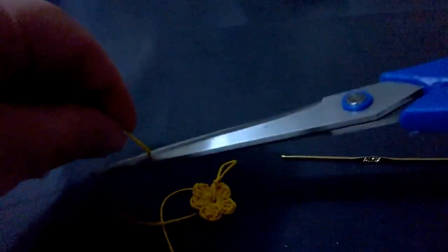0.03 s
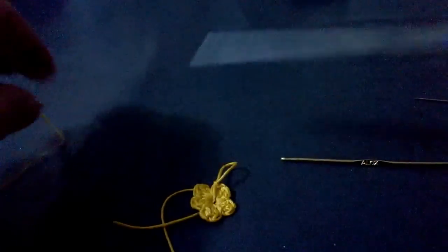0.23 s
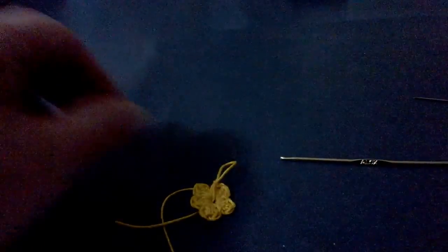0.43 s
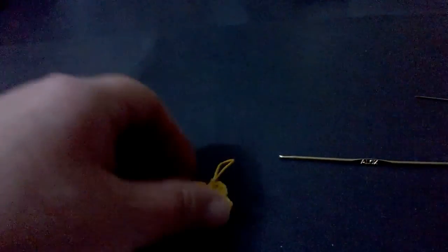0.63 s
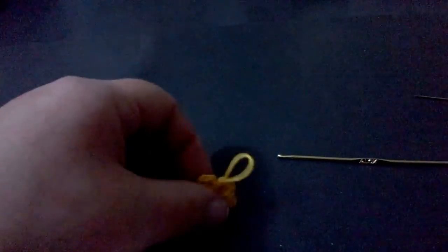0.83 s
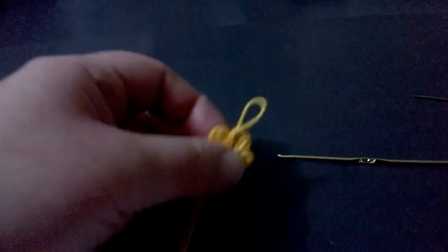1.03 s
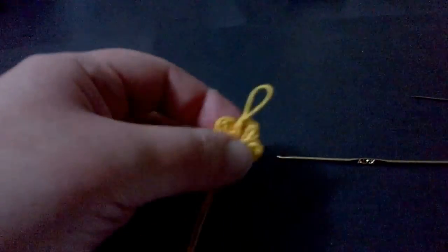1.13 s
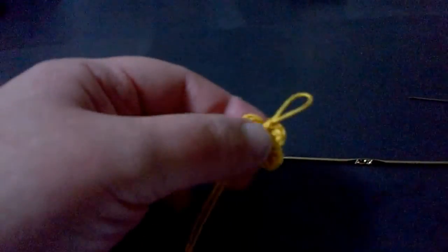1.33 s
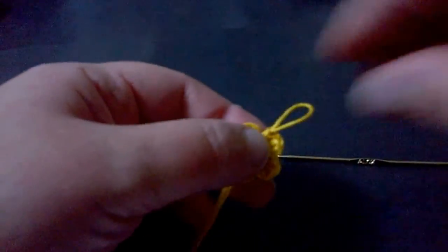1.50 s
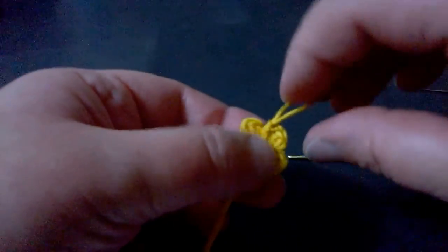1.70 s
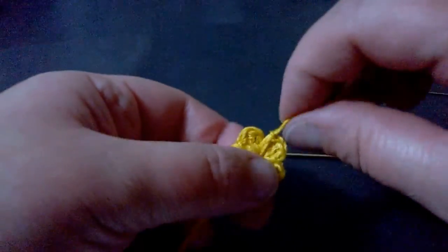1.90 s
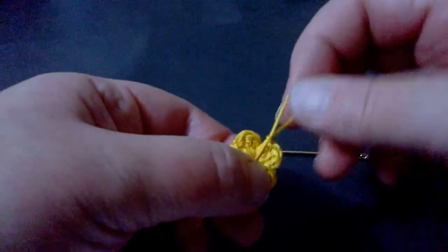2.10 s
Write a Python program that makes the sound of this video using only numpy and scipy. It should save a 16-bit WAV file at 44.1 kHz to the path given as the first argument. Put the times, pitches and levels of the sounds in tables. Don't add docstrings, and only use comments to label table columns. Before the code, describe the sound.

Scissors cut a thread with a bright, dry snip near the start; about a second later they are set down with a short rattling wooden knock, amid soft hand bumps and faint fan hiss, close microphone, small room.

```python
import sys
import numpy as np
from scipy import signal
from scipy.fft import rfft, irfft, next_fast_len
from scipy.io import wavfile
from scipy.ndimage import uniform_filter1d, map_coordinates

SR = 44100
rng = np.random.default_rng(int(sys.argv[2]) if len(sys.argv) > 2 else 0)


def wav_out(sig):
    wavfile.write(sys.argv[1], SR, np.round(np.clip(np.atleast_2d(sig).T, -1, 1) * 32767).astype(np.int16))


def ratio_of_db(decibels):
    return 10 ** (np.asarray(decibels, float) / 20)


N = 94815
SCATTER_DB = 1.5


def unit(x):
    return x / np.sqrt(np.mean(x ** 2) + 1e-20)


def along(points, hz):
    f, v = np.transpose(points)
    return np.interp(np.log(hz + 1), np.log(f + 1), v)


def level(rows):
    columns = np.transpose(rows)
    return ratio_of_db(np.interp(np.arange(N) / SR, columns[0], columns[-1]))


def wobble(rate):
    return map_coordinates(rng.standard_normal(400), [np.arange(N) * rate / SR])


def filtered(x, response):
    m = next_fast_len(N + SR // 2)
    hz = np.fft.rfftfreq(m, 1 / SR)
    return irfft(rfft(x, m) * response(hz), m)[..., :N]


def noise(response, patchy_db):
    z = signal.stft(rng.standard_normal(N), nperseg=512)[2]
    field = uniform_filter1d(rng.standard_normal(z.shape), size=4, axis=0)
    field = uniform_filter1d(field, size=12, axis=1)
    patchy = signal.istft(z * ratio_of_db(patchy_db * unit(field)), nperseg=512)[1][:N]
    return unit(filtered(patchy, response))


def struck(s, db, modes, attack_s, scatter_db):
    start = round(s * SR)
    t = np.clip(np.arange(N) / SR - s, 0, None)[start:][:SR // 3]
    hz, level_db, t60 = np.transpose(modes)[:, :, None]
    level_db = level_db + scatter_db * rng.standard_normal(hz.shape)
    ring = (ratio_of_db(db + level_db - 60 * t / t60) * np.sin(2 * np.pi * hz * t)).sum(0)
    out = np.zeros(N)
    out[start:][:len(t)] = ring * (1 - np.exp(-t / attack_s))
    return out


# (frequency [Hz], level [dB])
HISS_TONE = [(20, -5.5), (120, -3.5), (450, -4), (750, -16.5), (2400, -11.5), (3400, -13.5), (4300, -22.5),
             (16000, -35)]
# (time [s], level [dB])
RUMBLE = [(0, -80), (.8, -72), (1.7, -70), (1.85, -58.5), (1.95, -58.5), (2.15, -76)]
# (start [s], end [s], frequency [Hz], level [dB])
DRONES = [
    (0.47, 0.64, 294, -65.5),
    (0.685, .9, 294, -68.5),
    (1.706, 2.023, 430, -63),
    (0.497, 0.726, 83, -69),
    (1.9, 2.08, 220, -70),
    (1.62, 1.83, 960, -75.5),
]


def background():
    t = np.arange(N) / SR
    drones = np.zeros(N)
    for start_s, end_s, hz, db in DRONES:
        swell = np.sin(np.pi * np.clip((t - start_s) / (end_s - start_s), 0, 1)) ** 0.74
        tone = np.sin(2 * np.pi * hz * t + .5 * wobble(25.07))
        drones += ratio_of_db(db + 2.2 * wobble(21.92)) * swell * tone
    centre_hz, width_hz = 36.3, 21.3
    rumble = level(RUMBLE) * noise(lambda hz: np.exp(-((hz - centre_hz) / width_hz) ** 2), patchy_db=2.5)
    hiss = ratio_of_db(-66.5) * noise(lambda hz: ratio_of_db(along(HISS_TONE, hz)), patchy_db=.3)
    return hiss + rumble + drones


# (time [s], level [dB])
WHINE = [(0, -83), (.2, -96), (.26, -59), (.32, -67), (.47, -55), (.67, -60.5), (1.04, -59.5),
         (1.16, -70.5), (1.2, -61), (1.3, -67.5), (1.39, -64.5), (1.44, -82), (1.65, -59), (1.74, -80),
         (1.78, -62.5), (1.84, -69), (1.91, -54.5), (2.07, -62.5), (2.15, -54)]
# (time [s], level [dB])
FIFTH = [(0, -78), (.3, -72), (.5, -65.5), (.57, -75), (1.0, -72.5), (1.11, -59), (1.17, -84), (1.4, -81),
         (1.48, -57), (1.68, -89), (1.8, -62), (1.85, -75), (2.15, -67.5)]
# (multiple of the turning rate [-], level [dB], flutter [dB])
ORDERS = [(6, -73.5, 4), (14, -92, -4)]
# (frequency [Hz], width [Hz], level [dB])
HOUSING = [(1298, 75, -5), (1316, 32.3, -0.5), (1624, 36, -8), (1767, 51, -18.5), (1744, 29, 5.5),
           (1904, 25, 6), (2038, 10, -0.5)]
# (time [s], level [dB])
AIR = [(0, -65.5), (.15, -63.5), (.4, -62.5), (.49, -61), (.58, -62), (.8, -61.5), (.93, -60.5),
       (1.0, -61.5), (1.09, -62), (1.3, -63), (1.48, -61.5), (1.6, -62.5), (1.72, -65), (1.79, -62),
       (1.85, -62.5), (2.15, -62)]
# (frequency [Hz], level [dB])
AIR_TONE = [(750, -17.5), (1000, -9), (1320, 0.5), (1600, -2.5), (1900, -4), (2150, -6.5), (2500, -27.5),
            (3200, -42)]


def fan():
    motor_hz, wander_hz = 284.75, .25
    turn = 2 * np.pi * np.cumsum(motor_hz + wander_hz * wobble(13)) / SR
    tones = level(WHINE) * ratio_of_db(1.2 * wobble(30)) * np.sin(7 * turn)
    tones += level(FIFTH) * np.sin(5 * turn + 2)
    for order, db, flutter_db in np.round(ORDERS):
        tones += ratio_of_db(db + flutter_db * wobble(8.48)) * np.sin(order * turn + order)

    def resonances(hz):
        return sum(ratio_of_db(db) * 1j * hz * width / (centre * centre - hz * hz + 1j * hz * width)
                   for centre, width, db in HOUSING)

    shade = level(AIR)
    air = shade * noise(lambda hz: ratio_of_db(along(AIR_TONE, hz)), patchy_db=3.0)
    housing = ratio_of_db(-66) * shade / shade.mean() * noise(resonances, patchy_db=2.5)
    return np.sqrt(2) * tones + air + housing


# (frequency [Hz], t60 [s])
ROOM_DECAY = [(300, 0.13), (2000, 0.24), (5000, .22), (8000, 0.3), (12000, 0.16), (15000, 0.15)]
# (frequency [Hz], level [dB])
ROOM_TONE = [(300, -26.5), (1400, -9), (3200, -8.5), (4800, -19.5), (5400, -11.5), (6600, -9), (8700, -2),
             (12200, -6.5), (15800, -38)]
# (delay [s], level over the tail [dB])
WALLS = [(.0082, 7), (.0120, 6), (.0140, 4), (.0157, 4), (.0245, 4), (.0272, 4)]


def room(x):
    gap_s, rise_s, ends_s, wall_s = 0.0016, 0.01, 0.11, 0.001
    hz, t, z = signal.stft(rng.standard_normal(SR // 2), SR, nperseg=128)
    decay = ratio_of_db(-60 * t / along(ROOM_DECAY, hz)[:, None])
    tail = signal.istft(z * decay, SR, nperseg=128)[1]
    t = np.arange(len(tail)) / SR
    tail *= 1 - np.exp(-np.clip(t - gap_s, 0, None) / rise_s)
    tail *= np.exp(-(t / ends_s) ** 4)
    tail *= ratio_of_db(sum(db * np.exp(-((t - s) / wall_s) ** 2) for s, db in WALLS))
    tail *= ratio_of_db(2) / np.linalg.norm(tail)
    return filtered(signal.fftconvolve(x, tail)[:N], lambda hz: ratio_of_db(along(ROOM_TONE, hz)))


# (time [s], level [dB])
BUMPS = [
    (.53, -59),
    (.60, -53.5),
    (1.021, -59),
    (1.1197, -41),
    (1.139, -43.5),
    (1.162, -54),
    (1.40, -37),
    (1.44, -48),
    (1.72, -62),
]
# (frequency [Hz], level [dB], t60 [s])
PADDED = [(45, -6, 0.12), (92, 4.5, 0.073), (135.4, 0.5, 0.13), (225, -3, 0.028), (410, -15.5, 0.15)]
# (time [s], level [dB], frequency [Hz])
TICKS = [
    (.520, -56, 2300),
    (.515, -62, 425),
    (.596, -59, 3200),
    (.597, -63, 4000),
    (1.105, -60, 2200),
    (1.79, -67, 560),
]


def hands():
    bumps = sum(struck(s, db - 7, PADDED, attack_s=0.00094, scatter_db=1.0) for s, db in BUMPS)
    ticks = sum(struck(s, db, [(hz, 0, 0.025)], attack_s=.0004, scatter_db=0) for s, db, hz in TICKS)
    return bumps + ticks


KNOCK_S = [
    1.3576,
    1.3588,
    1.3624,
    1.3660,
    1.3708,
    1.3732,
    1.3768,
    1.3808,
    1.3995,
]
# (level [dB], hardness [dB])
KNOCK_DB = [(-45, 20.5), (-27, -13.5), (-37.5, -27), (-30.5, -22), (-39, 10.5), (-30, -3), (-41.5, -14),
            (-30.5, -22), (-38, -13)]
# (frequency [Hz], level [dB], t60 [s])
TABLE = [(153, -11.5, 0.21), (218.5, 0, 0.076), (256, 1, 0.07), (356, 0, 0.084), (501.5, -2.5, .07),
         (632.6, -16.5, 0.15)]
# (frequency [Hz], level [dB], t60 [s])
TABLE_TOP = [(883, -14.5, 0.11), (1047, 0, 0.023), (1185, 0, 0.012)]
# (time [s], level [dB])
RATTLES = [
    (1.333, -70),
    (1.3580, -59),
    (1.3598, -51),
    (1.3650, -56),
    (1.3722, -65),
    (1.3740, -59),
]
# (frequency [Hz], level [dB], t60 [s])
LOOSE = [(5000, -18, .004), (8200, -5, .012), (10600, -8, .005), (11650, 1, .011), (12300, -3, .009),
         (15200, -18, .005)]


def set_down():
    out = np.zeros(N)
    for s, (db, hard_db) in zip(KNOCK_S, KNOCK_DB):
        out += struck(s, db - 8.5, TABLE, attack_s=0.00074, scatter_db=SCATTER_DB)
        out -= struck(s, db + hard_db - 9, TABLE_TOP, attack_s=0.00021, scatter_db=SCATTER_DB)
    for s, db in RATTLES:
        out += struck(s, db, LOOSE, attack_s=0.0001, scatter_db=SCATTER_DB)
    return out


# (frequency [Hz], level [dB])
SHEAR_TONE = [(150, 4), (1000, -28), (3000, -8), (6000, -3), (9000, -8), (13000, -4), (15500, -34)]
SNAP_S = [
    .2017,
    .2024,
    .20484,
    .20508,
    .20556,
    .20600,
    .20642,
    .20682,
    .20708,
    .2077,
]
# (level [dB], brightness [dB])
SNAP_DB = [(-44, 4), (-42, 4), (-19.5, -8), (-33, 21.5), (-33, 17), (-30, 13), (-24, 2), (-31, 11),
           (-33, 13), (-46, 13)]
# (frequency [Hz], level [dB], t60 [s])
BLADES = [(1400, -3, 0.0038), (2240, 2.5, 0.015), (2890, -1.5, 0.0077), (3440, -14, 0.016)]
# (frequency [Hz], level [dB], t60 [s])
EDGES = [(5900, -6, .0025), (7150, -4, .003), (8150, -2, .003), (9400, -7, .003), (10800, -8, .003),
         (11900, -11, .0025)]
# (frequency [Hz], level [dB], t60 [s])
GRIP = [(71, -52, 0.093), (173, -37, 0.013), (358, -33.5, .03), (700, -65, 0.025)]


def snip():
    start_s, end_s, scrape_db, rise_db = .1945, .2042, -41, 20
    part = (np.arange(N) / SR - start_s) / (end_s - start_s)
    out = noise(lambda hz: ratio_of_db(along(SHEAR_TONE, hz)), patchy_db=0)
    out *= (part > 0) * (part < 1) * ratio_of_db(scrape_db + rise_db * (np.clip(part, 0, 1) - 0.5))
    for s, (db, bright_db) in zip(SNAP_S, SNAP_DB):
        out += struck(s, db - 5.5, BLADES, attack_s=.00005, scatter_db=SCATTER_DB)
        out -= struck(s, db + bright_db - 3, EDGES, attack_s=.00009, scatter_db=SCATTER_DB)
    return out + struck(SNAP_S[2], -3, GRIP, attack_s=0.00098, scatter_db=4)


def scene():
    table = set_down() + hands()
    sent = ratio_of_db(-10) * table
    sent[round(SNAP_S[2] * SR)] += ratio_of_db(-4.5)
    return (snip() + table + room(sent) + fan() + background())[None]


def top_cut(x):
    return signal.sosfilt(signal.butter(12, 16500, fs=SR, output="sos"), x)


def record(dry):
    mix = filtered(dry, lambda hz: hz < 15760)
    return top_cut(mix)


dry = scene()
out = record(dry)
wav_out(out)
```